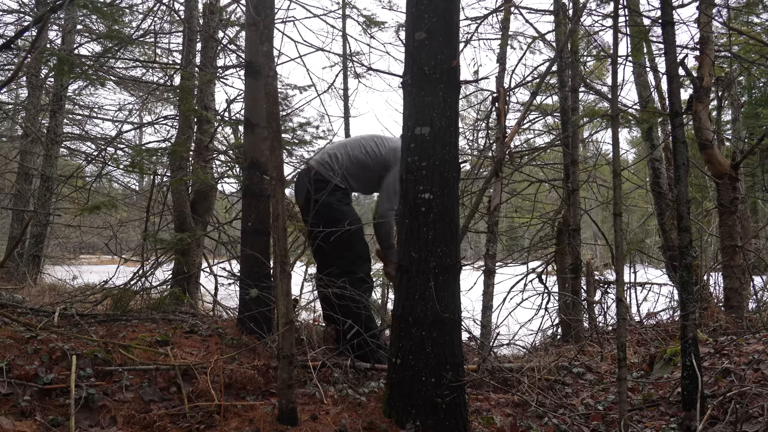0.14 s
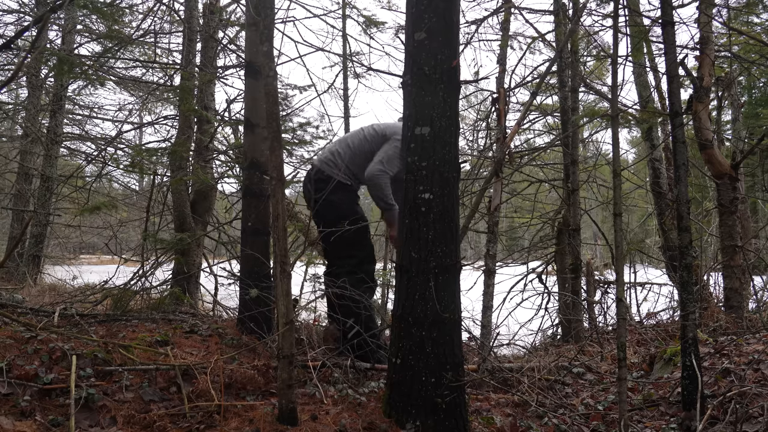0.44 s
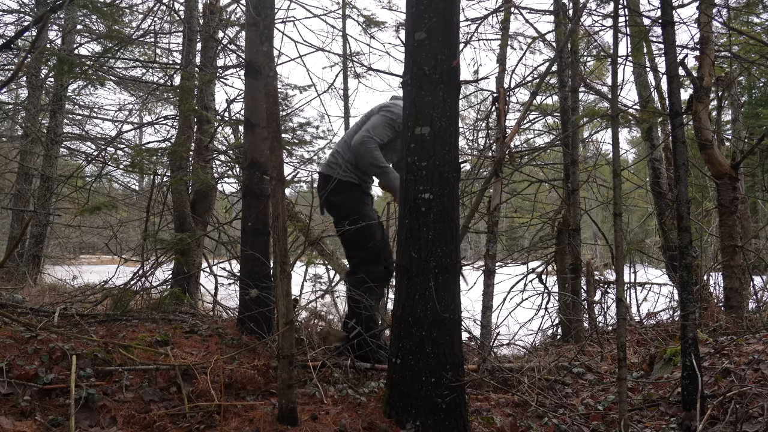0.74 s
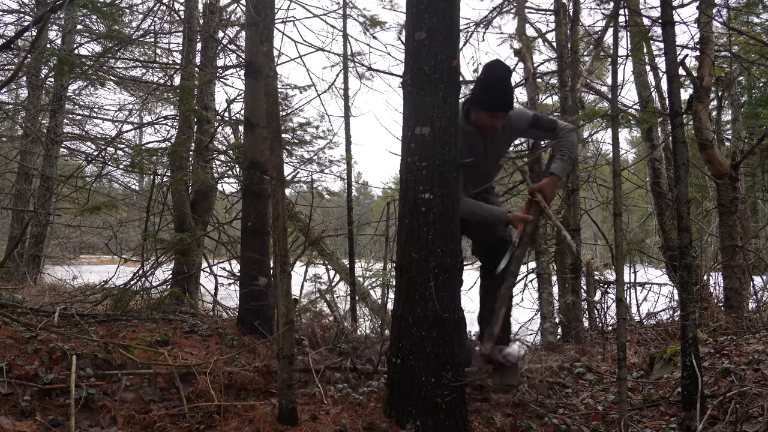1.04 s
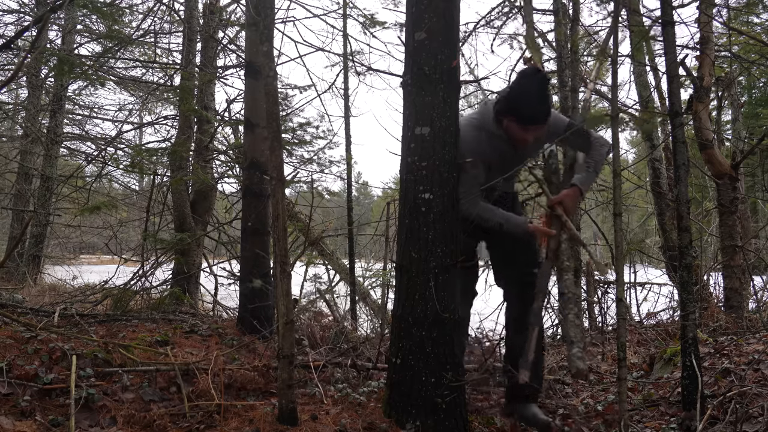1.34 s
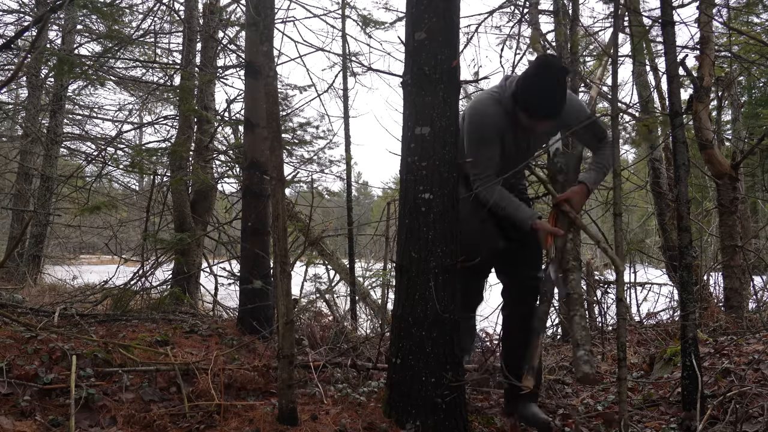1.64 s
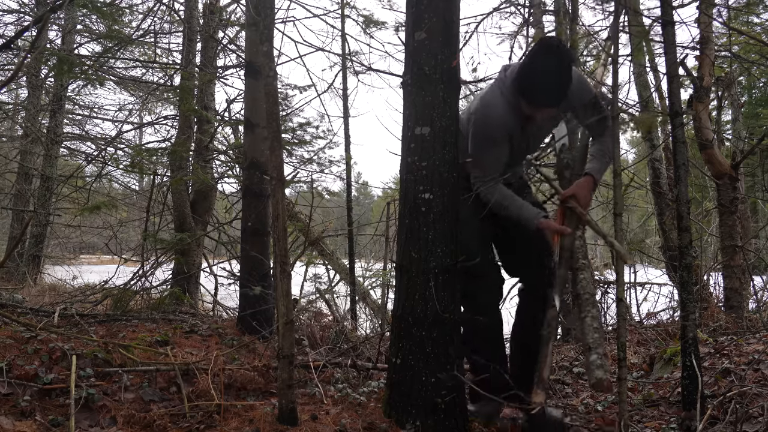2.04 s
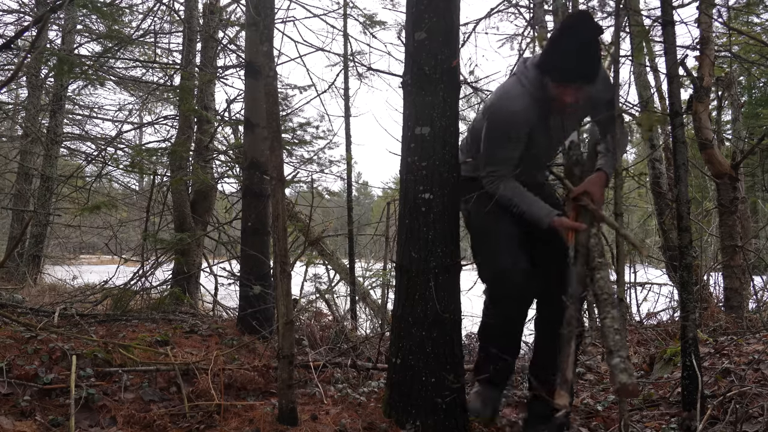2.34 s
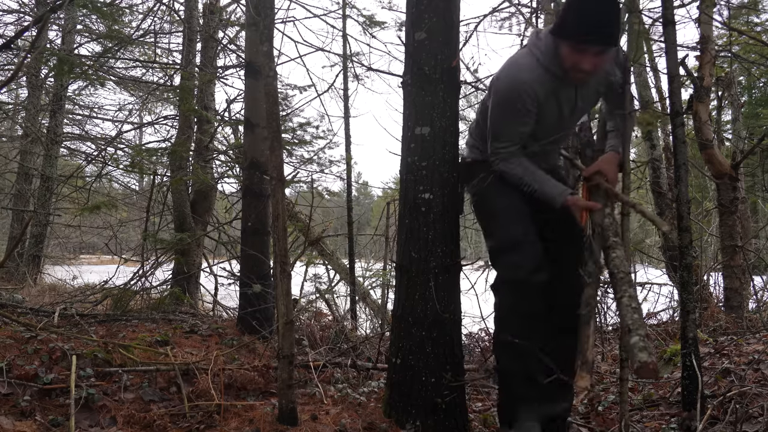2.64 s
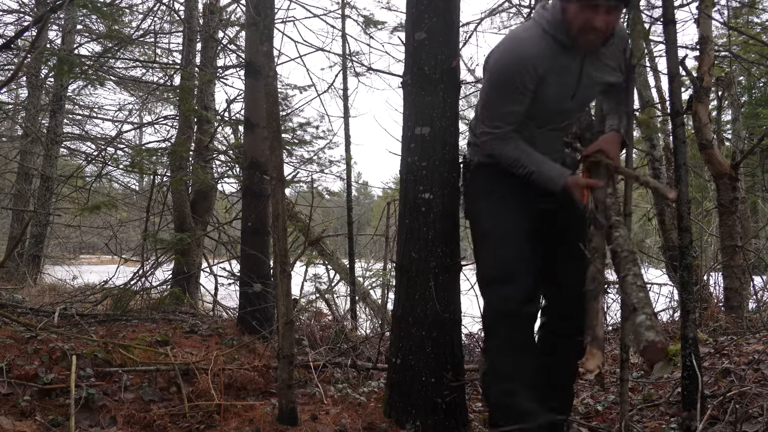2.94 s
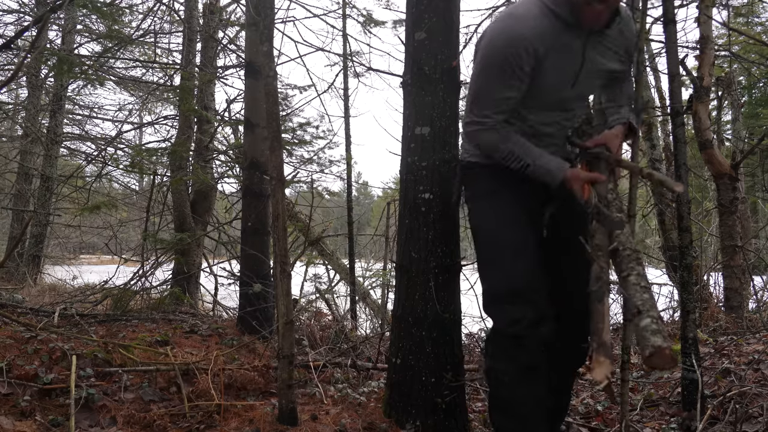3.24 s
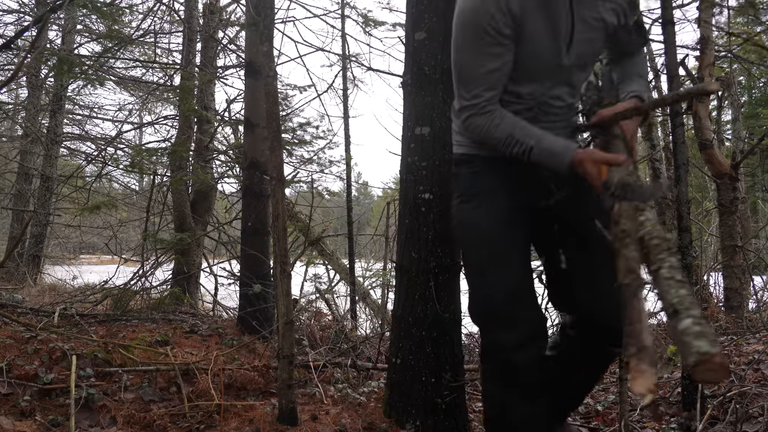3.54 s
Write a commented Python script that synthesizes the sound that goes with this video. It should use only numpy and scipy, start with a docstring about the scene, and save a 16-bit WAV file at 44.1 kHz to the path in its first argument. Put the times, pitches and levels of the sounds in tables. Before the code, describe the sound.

Dry branches snap and scrape through leaves: a brief low rub and rustle, a quieter gap with small snaps, then denser cracking and dragging in a conifer wood, approaching a fixed microphone, loudest near the end.

```python
"""A low rubbing tone sinks away in a rustle of boots, dragged wood and dry leaves: someone pulls dead
branches out of the brush in a conifer wood and drags them towards the microphone.
Dry poles knock as damped modes, twigs snap as bursts of splinters, and bark squeaks as resonated noise.
Filtered noise and clicks make the rustle, and short swells of rumble the footfalls.
The trunks scatter every crack into a noise tail, weakest at the end as the load comes closer."""
import sys
import numpy as np
from scipy import signal
from scipy.io import wavfile
from scipy.ndimage import uniform_filter1d

SR = 44100
rng = np.random.default_rng(int(sys.argv[2]) if len(sys.argv) > 2 else 0)


def inscribe(sig):
    """Save sig as 16-bit PCM at rate SR to the path in sys.argv[1].

    A 1-D sig is mono; a 2-D sig holds one channel per row.
    Samples are clipped to [-1, 1] before scaling.
    """
    pcm = np.round(np.clip(np.atleast_2d(sig).T, -1, 1) * 32767)
    wavfile.write(sys.argv[1], SR, pcm.astype(np.int16))


N = 163170
TIME = np.arange(N) / SR


def amp(db):
    """Decibels to gain."""
    return 10 ** (np.asarray(db) / 20)


def unit(x):
    """Scales to rms 1."""
    return x / np.sqrt(np.mean(x ** 2) + 1e-20)


def read(points, hz):
    """Reads a table on a log-frequency axis."""
    f, value = np.transpose(points)
    return np.interp(np.log(hz + 1), np.log(f + 1), value)


def curve(table, axis=1):
    """One column of a time table, for every sample."""
    columns = np.transpose(table)
    return np.interp(TIME, columns[0], columns[axis])


def add(mix, s, sound):
    """Mixes a sound in at time s."""
    part = mix[max(round(s * SR), 0):][:len(sound)]
    part += sound[:len(part)]


def sharpest(gain):
    """The causal (minimum-phase) spectrum with this gain and the sharpest possible attack."""
    return np.exp(np.conj(signal.hilbert(np.log(gain))))


def colour(x, points, size=2048):
    """Filters a sound by a spectrum table, keeping attacks sharp."""
    gain = amp(read(points, abs(np.fft.fftfreq(size, 1 / SR))))
    impulse = np.fft.ifft(sharpest(gain)).real[:size // 2]
    return signal.fftconvolve(x, impulse)[:len(x)]


def resonate(x, hz, width):
    """A steep resonance: the same band-pass twice."""
    b, a = signal.iirpeak(hz, hz / width, fs=SR)
    return signal.lfilter(b, a, signal.lfilter(b, a, x))


def wander(rate_hz):
    """Random drift of rms 1: straight lines between random points, rate_hz points a second."""
    return unit(np.interp(TIME * rate_hz, np.arange(N), rng.standard_normal(N)))


# a low rubbing tone that sinks as the first pull slows: t/s, f/Hz, level/dB
RUB_GLIDE = [(0, 180, -37), (.045, 146, -34), (.095, 77, -36), (.135, 60, -50)]
RUB_JITTER, RUB_ROUGH = .16, .55  # rms swing of pitch and of loudness, as fractions


def rub():
    """Stick-slip friction as a sinking tone with uneven pitch, loudness and second harmonic."""
    hz = curve(RUB_GLIDE) * (1 + RUB_JITTER * wander(146))
    turns = np.cumsum(hz) / SR
    tone = np.sin(2 * np.pi * turns) + 0.25 * wander(93) * np.sin(4 * np.pi * turns)
    rough = unit(1 + RUB_ROUGH * wander(98))
    return amp(curve(RUB_GLIDE, axis=2)) * rough * tone * (TIME < RUB_GLIDE[-1][0])


def crackle(spectrum, per_s, spread_db, smooth, clump_db, clump_hz, ring_s, low_hz, high_hz, ring, count=24):
    """Tiny clicks, some ringing a leaf or twig of their own pitch, over a smooth sliding hiss."""
    size = amp(spread_db * np.minimum(rng.exponential(1, N), 4)) * rng.choice([-1, 1], N)
    clicks = size * (rng.random(N) < per_s / SR)
    which, t = rng.integers(0, count, N), np.arange(SR // 40) / SR
    rings = np.zeros(N)
    for k, hz in enumerate(np.linspace(low_hz, high_hz, count)):
        mode = np.exp(-t / ring_s) * np.cos(2 * np.pi * hz * t)
        rings += signal.oaconvolve(clicks * (which == k), mode)[:N]
    grains = unit(clicks) + ring * unit(rings) + smooth * rng.standard_normal(N)
    clumped = grains * amp(clump_db * wander(clump_hz))
    return unit(colour(clumped, spectrum))


JERKS_PER_S, JERK_S, JERK_DEPTH = 130, .005, .42  # mean rate, decay time, rise per unit kick


def jerks():
    """The load catches and slips: sudden rises of the rustle that die away at once."""
    kicks = (rng.random(N) < JERKS_PER_S / SR) * rng.uniform(.4, 1.4, N)
    rises = signal.lfilter([1], [1, -np.exp(-1 / (JERK_S * SR))], kicks)
    return unit(1 + JERK_DEPTH * rises)


PATCH_DB = 1.7  # rms swing of the colour


def shifting(x):
    """Ever new leaves and sticks are touched, so the colour changes in short patches."""
    z = signal.stft(x, nperseg=512)[2]
    across_pitch = uniform_filter1d(rng.standard_normal(z.shape), size=9, axis=0)
    patches = uniform_filter1d(across_pitch, size=5, axis=1)
    return signal.istft(z * amp(PATCH_DB * unit(patches)))[1][:N]


# how hard the load is dragged, before the trims:
# t/s, scuffing level/dB, dragged wood level/dB, dry leaves level/dB
RUSTLE_LEVELS = [(0, -35, -35.5, -35), (0.06, -43, -43, -39.5), (0.125, -55, -58.5, -53),
                 (0.175, -33, -36.5, -38), (0.26, -42.5, -43.5, -33), (0.36, -59, -53, -50),
                 (0.6, -57.5, -53, -56.5), (0.79, -55.5, -49.5, -50.5), (0.97, -52.5, -41.5, -38),
                 (1.02, -44.5, -34, -34), (1.14, -36, -33.5, -32), (1.24, -39.5, -34.5, -39),
                 (1.33, -40.5, -31.5, -32), (1.38, -45, -36, -36.5), (1.52, -42, -29.5, -35.5),
                 (1.69, -53, -38.5, -43), (1.9, -46, -34, -33), (1.97, -46.5, -36.5, -38),
                 (2.1, -47, -36, -35), (2.17, -45, -41.5, -41.5), (2.25, -41.5, -30.5, -32.5),
                 (2.31, -44.5, -36, -39.5), (2.4, -51, -40, -35), (2.62, -56, -39.5, -42),
                 (2.8, -50, -39.5, -41.5), (2.92, -52, -36, -39), (3.13, -43.5, -31, -33.5),
                 (3.27, -47, -39, -36), (3.35, -47, -31, -33), (3.48, -48, -36, -39.5),
                 (3.57, -43.5, -30.5, -35), (3.7, -47, -35.5, -32)]
# spectrum of boots scuffing the ground: f/Hz, level/dB
SCUFF_SPECTRUM = [(20, -5), (45, 0.5), (200, 2), (600, -7), (2000, -69)]
# spectrum of wood scraping along the ground: f/Hz, level/dB
DRAG_SPECTRUM = [(100, -23.5), (250, -2.5), (700, 0), (1700, -4.5), (2500, -10), (4000, -7.5),
                 (16000, -26.5)]
# spectrum of dry leaves: f/Hz, level/dB
LEAF_SPECTRUM = [(500, -32), (1500, -1), (3000, 1.5), (7000, -4), (13000, -2.5), (16000, 0.5)]
SCUFF_TRIM_DB, DRAG_TRIM_DB, LEAF_TRIM_DB = 1, -1.66, -2.5


def rustle():
    """Boots scuff, wood scrapes over the ground and leaves crackle, the last two in the same jerks."""
    scuff = unit(colour(rng.standard_normal(N) * amp(3.1 * wander(40)), SCUFF_SPECTRUM))
    drag = crackle(DRAG_SPECTRUM, per_s=1400, spread_db=1.35, smooth=0.87, clump_db=0.0, clump_hz=131.0,
                   ring_s=0.0044, low_hz=354, high_hz=2786, ring=0.63)
    leaves = crackle(LEAF_SPECTRUM, per_s=3500, spread_db=-0.5, smooth=0.88, clump_db=-0.5, clump_hz=180,
                     ring_s=0.00091, low_hz=2500, high_hz=14100, ring=0.57)
    dragged = drag * amp(DRAG_TRIM_DB + curve(RUSTLE_LEVELS, axis=2))
    dragged += leaves * amp(LEAF_TRIM_DB + curve(RUSTLE_LEVELS, axis=3))
    return scuff * amp(SCUFF_TRIM_DB + curve(RUSTLE_LEVELS)) + jerks() * shifting(dragged)


TICKS_PER_S, TICK_HZ = 55, (900, 9000)  # rate, pitch range
TICK_DB, TICK_S = 7.5, 0.00064  # peak of the smallest above the drag level, decay of the noise


def ticks():
    """Tiny twigs give way in the litter, each with its own pitch, louder when the wood is dragged harder."""
    out, t = np.zeros(N), np.arange(SR // 100) / SR
    stir_db = curve(RUSTLE_LEVELS, axis=2)
    for when, pitch, size in rng.random((int(TICKS_PER_S * N / SR), 3)):
        hz = TICK_HZ[0] * (TICK_HZ[1] / TICK_HZ[0]) ** pitch
        tick = resonate(rng.standard_normal(len(t)) * np.exp(-t / TICK_S), hz, hz)
        peak_db = TICK_DB + stir_db[int(when * N)] + 10 * size ** 2
        add(out, when * N / SR, amp(peak_db) * tick / abs(tick).max())
    return out


# poles and sticks that ring when knocked or broken: t/s, f/Hz, peak level/dB, ring time/s
POLE_KNOCKS = [(.032, 390, -31.5, 0.013), (.387, 483, -28, 0.0021), (0.509, 1490, -26.5, 0.0044),
               (.581, 2220, -37, 0.01), (1.131, 480, -19.5, 0.002), (1.218, 1740, -15, 0.0019),
               (1.2935, 727, -15.5, 0.0027), (2.0207, 1680, -22, .0035), (2.212, 500, -16.5, 0.00078),
               (2.2843, 1980, -14.5, 0.0013), (2.7785, 416, -20.5, 0.0026), (2.8316, 398, -20.5, 0.0035),
               (2.8895, 443, -21, 0.004), (2.9316, 470, -17.5, 0.003), (3.108, 1190, -18, .002),
               (3.1908, 494, -7.5, 0.00082)]
KNOCK_RISE_CYCLES = 0.63  # softness of the start
SCRAPE_DB, SCRAPE_S = -8, 0.01  # level against the blow, decay time


def knocks():
    """One heavily damped mode with a soft start, then a rough scrape around its pitch as the wood slides on."""
    out, t = np.zeros(N), np.arange(SR // 4) / SR
    for s, hz, db, ring_s in POLE_KNOCKS:
        shape = (1 - np.exp(-t * hz / KNOCK_RISE_CYCLES)) ** 2 * np.exp(-t / ring_s)
        blow = amp(db) * shape / shape.max() * np.sin(2 * np.pi * hz * t)
        scrape = resonate(rng.standard_normal(len(t)) * np.exp(-t / SCRAPE_S), hz, hz)
        add(out, s, blow + amp(SCRAPE_DB) * blow.std() * unit(scrape))
    return out


# the bands body, crack, bite and fizz: centres, widths, and the time over which their level is taken
SNAP_BANDS_HZ, SNAP_WIDTHS_HZ, LEVEL_SPAN_S = [450, 1500, 4000, 10500], [700, 1600, 4000, 9000], .01
BASS_CUT_HZ = 216
FRACTURE_S, CLEAN_BREAK_S = .00018, .0017  # decay of the first crack, splintering time of a fairly clean break
SPLINTERS_PER_S, SPLINTER_SPREAD_DB = 14000, 3


def snap(body_db, crack_db, bite_db, fizz_db, splinter_s, size=4096):
    """One fracture and a dying burst of splinters; the quicker the break, the more is in the first click."""
    t = np.arange(size) / SR
    fibres = rng.choice([-1, 1], size) * amp(SPLINTER_SPREAD_DB * rng.standard_normal(size))
    burst = fibres * (rng.random(size) < SPLINTERS_PER_S / SR) * np.exp(-t / (2 * splinter_s))
    clean = np.exp(-np.square(splinter_s / CLEAN_BREAK_S))  # share of the energy in the first click
    burst *= np.sqrt(1 - clean) / (np.linalg.norm(burst) + 1e-9)
    fracture = rng.standard_normal(size) * t * np.exp(-t / FRACTURE_S)
    burst += np.sqrt(clean) * fracture / np.linalg.norm(fracture)
    # flatten the broad spectrum, so that the four bands alone set the colour
    spectrum = np.fft.fft(burst)
    power = uniform_filter1d(abs(spectrum) ** 2, size=36, mode="wrap") + 1e-9
    white = np.fft.ifft(spectrum * sharpest(power ** -.5)).real
    band_db = np.array([body_db, crack_db, bite_db, fizz_db])
    per_hz = band_db + 10 * np.log10(SR * LEVEL_SPAN_S * SR / 2 / np.array(SNAP_WIDTHS_HZ))
    crack = colour(white, list(zip(SNAP_BANDS_HZ, per_hz)))
    return signal.lfilter(*signal.butter(2, BASS_CUT_HZ, "high", fs=SR), crack)


# breaking twigs, before trim and bass cut:
# t/s, body level/dB, crack level/dB, bite level/dB, fizz level/dB, splintering time/s
TWIG_SNAPS = [(0.1362, -25.5, -36, -29.5, -32, 0.0024), (0.1398, -45, -28.5, -27, -33, 0.0033),
              (0.1508, -28, -40, -29, -33, 0.0026), (0.2268, -55, -42, -30, -42, 0.006),
              (0.257, -61, -47, -33, -30.5, 0.0058), (0.2708, -27, -30, -27, -36.5, 0.0059),
              (0.3082, -54, -32, -38, -73, 0.0026), (0.5071, -48, -33.5, -33, -38, 0.003),
              (0.5796, -47, -35.5, -39.5, -40.5, 0.0045), (0.679, -81, -41, -44, -71, 0.0027),
              (0.721, -79, -46, -44, -88, 0.0021), (0.762, -49, -37.5, -40, -68, 0.0085),
              (0.821, -38.5, -36, -33, -36.5, 0.0036), (0.9938, -42, -36, -35, -29, 0.00086),
              (1.099, -37, -39, -34, -29.5, 0.0071), (1.2173, -36, -25, -27.5, -23.5, 0.0019),
              (1.225, -69, -22, -24.5, -35, 0.012), (1.2964, -32, -24.5, -28.5, -46, 0.00079),
              (1.4031, -32, -28.5, -33, -27.5, 0.0009), (1.5148, -31, -29, -34.5, -28.5, 0.0019),
              (1.555, -40, -32, -28.5, -33, 0.0066), (1.642, -37, -34, -34, -29, 0.0016),
              (1.6534, -49, -33, -29, -24, 0.0017), (1.707, -58, -39.5, -22.5, -32.5, 0.0024),
              (1.807, -46, -32, -44, -35, 0.0021), (1.8846, -30, -44, -25.5, -40, 0.0072),
              (1.9968, -30, -22.5, -34.5, -39, 0.0014), (2.0201, -33.5, -23.5, -23, -30, 0.002),
              (2.0949, -53, -28, -34.5, -42, 0.011), (2.1998, -47, -38, -37, -40.5, 0.0037),
              (2.284, -32.5, -27.5, -30.5, -21, 0.0011), (2.6843, -62, -58, -34, -37, 0.0017),
              (2.6999, -39.5, -32.5, -32, -28, 0.002), (2.8631, -35, -28, -27, -30, 0.0027),
              (2.9149, -26, -27.5, -28, -45, 0.012), (2.9314, -27.5, -27, -33.5, -19.5, 0.0014),
              (3.0399, -34, -23, -28, -14, 0.00053), (3.0425, -28, -40, -22.5, -30, 0.0017),
              (3.0855, -34, -29, -34, -34, 0.001), (3.1075, -30, -26, -28, -43, 0.0016),
              (3.1163, -32.5, -20.5, -29.5, -36, 0.00037), (3.1759, -28.5, -24, -25.5, -20, 0.00019),
              (3.1916, -21, -14.5, -30, -15, 0.0012), (3.3175, -30, -32.5, -28.5, -20.5, 0.0023),
              (3.33, -57, -69, -28, -23, 0.0052), (3.4388, -52, -43, -44, -32, 0.0011),
              (3.5229, -32, -32.5, -35, -38, 0.0011)]
SNAP_TRIM_DB, GROUND_DB = -0.5, -16  # all snaps, bounce against its snap


def snaps():
    """All breaking twigs, each with its delayed, weaker bounce off the ground."""
    out = np.zeros(N)
    for s, *row in TWIG_SNAPS:
        crack = amp(SNAP_TRIM_DB) * snap(*row)
        add(out, s, crack)
        add(out, s + rng.uniform(0.001575, 0.002275), amp(GROUND_DB) * crack)
    return out


# dry bark slipping on bark: t/s, f/Hz, rms level/dB, length/s
BARK_SQUEAKS = [(0.327, 2750, -37.5, 0.016), (0.437, 3850, -40, 0.0086), (0.4637, 3060, -28.5, 0.005),
                (0.48, 3266, -31.5, 0.0041), (2.976, 1670, -36, 0.23)]
# resonances of the dry stick: f as a multiple of the pitch, width/Hz of the shortest slides, level/dB
STICK_MODES = [(.85, 1500, -3), (1, 260, 1)]


def squeaks():
    """Slips excite a few resonances of a dry stick; long slides ring more narrowly."""
    out, t = np.zeros(N), np.arange(SR // 4) / SR
    for s, hz, db, length in BARK_SQUEAKS:
        swell = np.sin(np.pi * np.minimum(t / length, 1) ** 0.49) ** 2
        slips = rng.standard_normal(len(t)) * swell
        sound = np.zeros(len(t))
        for k, width, mode_db in STICK_MODES:
            sound += amp(mode_db) * unit(resonate(slips, hz * k, width / (1 + length / 0.22)))
        # the rms level counts over half the length
        add(out, s, amp(db) * sound / np.linalg.norm(sound) * np.sqrt(length * SR / 2))
    return out


# heavy footfalls in soft ground: t/s, upper edge f/Hz, rms level/dB, length/s
FOOTFALLS = [(1.197, 426, -33, 0.042), (1.292, 110, -30.5, .04), (2.282, 70, -39, 0.046),
             (3.19, 240, -26, 0.0072)]


def steps():
    """Soft ground gives under a boot: a short swell of dull rumble."""
    out, t = np.zeros(N), np.arange(SR // 4) / SR
    for s, top_hz, db, length in FOOTFALLS:
        push = rng.standard_normal(len(t)) * np.sin(np.pi * np.minimum(t / length, 1) ** .5)
        band = signal.butter(2, [top_hz / 4, top_hz], "band", fs=SR, output="sos")
        thud = signal.sosfilt(band, push)
        add(out, s, amp(db) * thud / np.linalg.norm(thud) * np.sqrt(length * SR))
    return out


# how long nearby trunks scatter each pitch: f/Hz, time to fall 60 dB/s
TRUNK_DECAY = [(3000, 0.09), (8000, 0.16), (16000, 0.064)]
FAR_DB, FAR_T60_S = -21.5, 1  # start level against the near scatter, time to fall 60 dB


def forest(x):
    """Scatter from nearby trunks, and a faint longer tail from the wood beyond, as decaying noise."""
    hz, t, z = signal.stft(rng.standard_normal(SR // 2), SR, nperseg=128)
    near = amp(-60 * t / read(TRUNK_DECAY, hz)[:, None])
    far = amp(FAR_DB) * amp(-60 * t / FAR_T60_S)
    tail = signal.istft(z * (near + far), SR)[1]
    tail *= np.minimum(np.arange(len(tail)) / SR / 0.015, 1)  # the scatter builds up over 15 ms
    return signal.fftconvolve(x, tail / np.linalg.norm(tail))[:N]


# send into the scatter, least at the end, when the load is close: t/s, level/dB
SCATTER_SEND = [(0, -11.5), (.8, -7), (1.1, -13), (2.3, -12.5), (3.7, -19)]


def scene():
    """Wood sounds with their scatter, over footfalls, rubbing and rustle."""
    ground = rub() + rustle() + steps()
    wood = ticks() + knocks() + snaps() + squeaks()
    scattered = forest(wood * amp(curve(SCATTER_SEND)))
    return (wood + scattered + ground)[None]


# response of the microphone: f/Hz, level/dB
MIC_RESPONSE = [(20, -4.5), (5000, 1), (6700, 0), (8300, 4.5), (9300, 0), (10500, -5), (13200, 1),
                (14500, -7.5), (16000, -4.5)]
EDGE_HZ = 15950  # upper band limit


def record(dry):
    """A microphone with two treble peaks, overload at full scale, then the band limit."""
    loud = np.clip(colour(dry[0], MIC_RESPONSE), -1, 1)
    low_pass = signal.firwin(301, EDGE_HZ, window=("kaiser", 7), fs=SR)
    return signal.oaconvolve(loud, low_pass, "same")[None]


dry = scene()
out = record(dry)
inscribe(out)
```